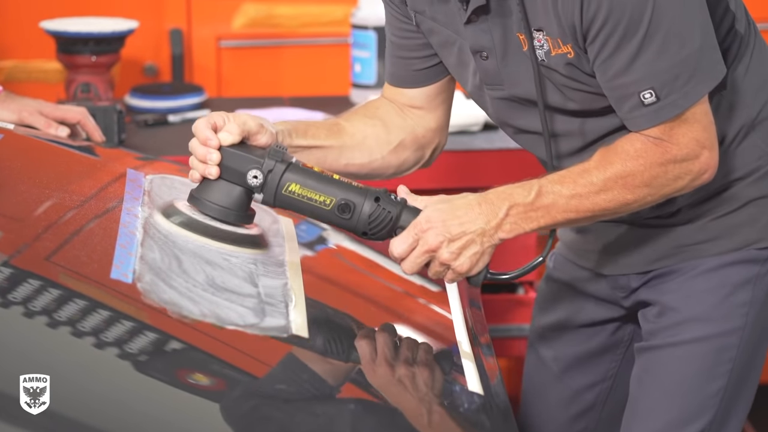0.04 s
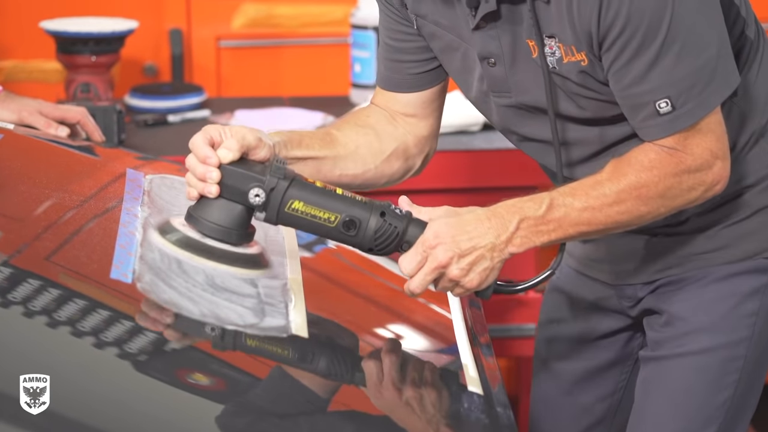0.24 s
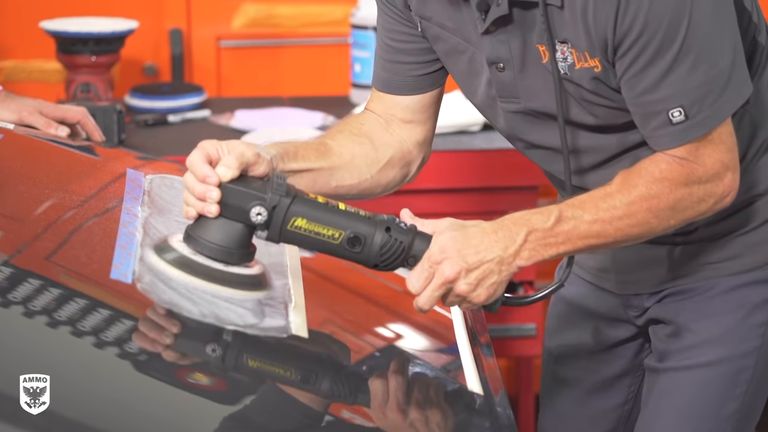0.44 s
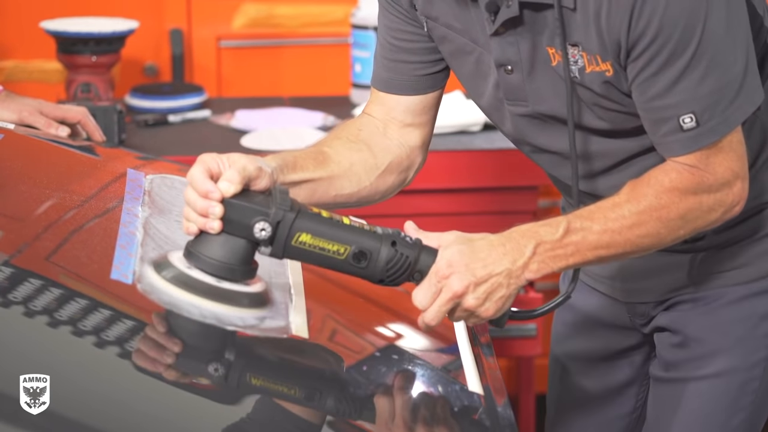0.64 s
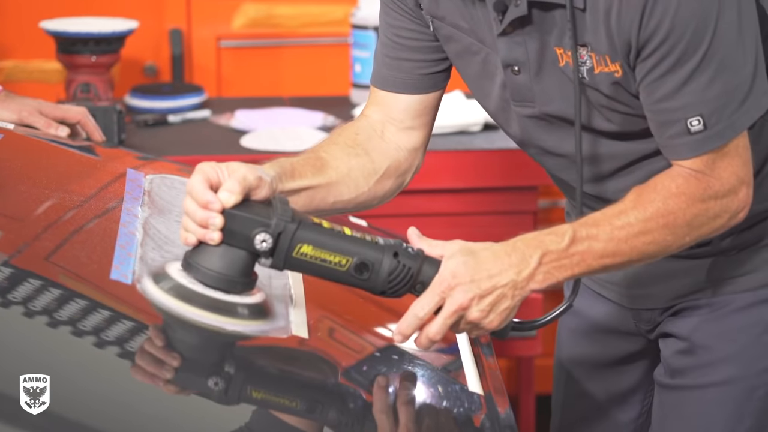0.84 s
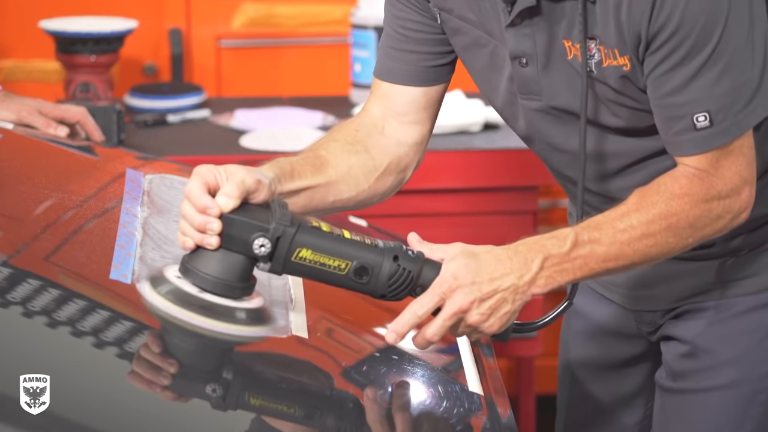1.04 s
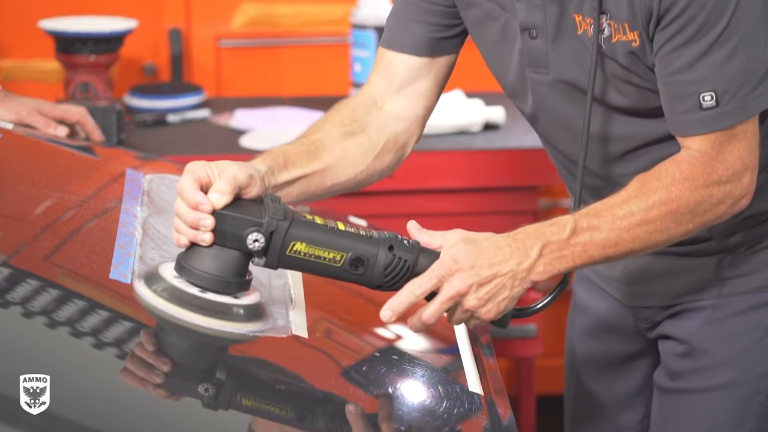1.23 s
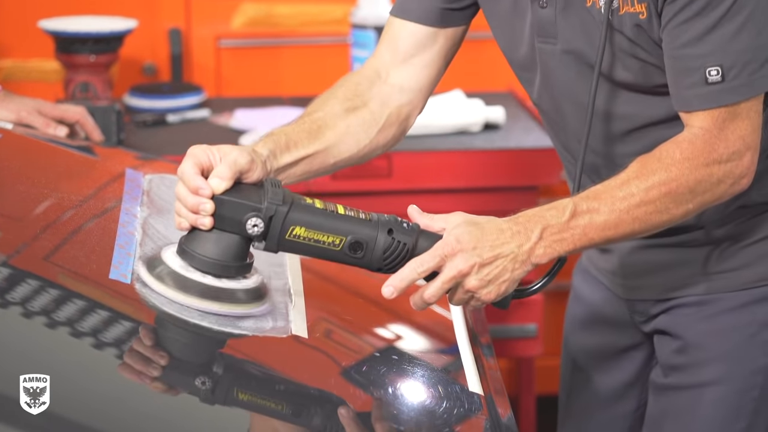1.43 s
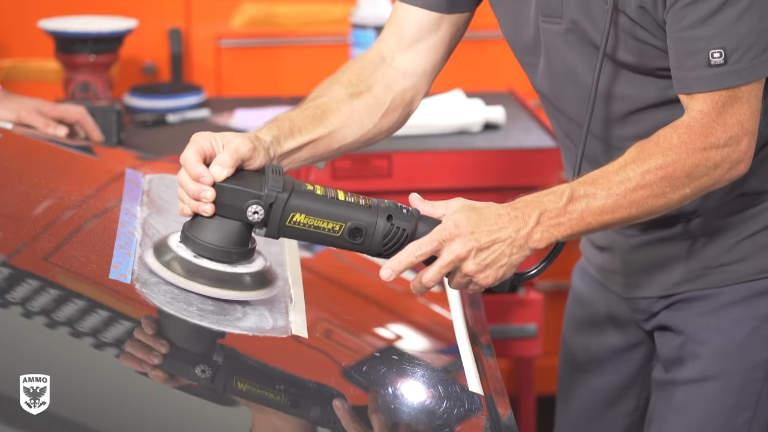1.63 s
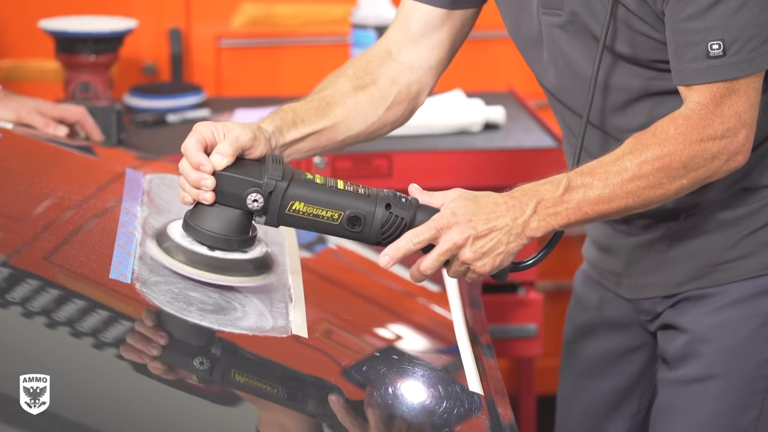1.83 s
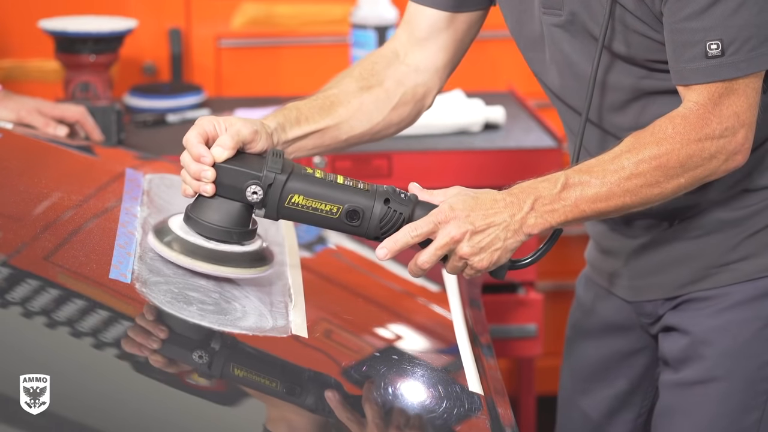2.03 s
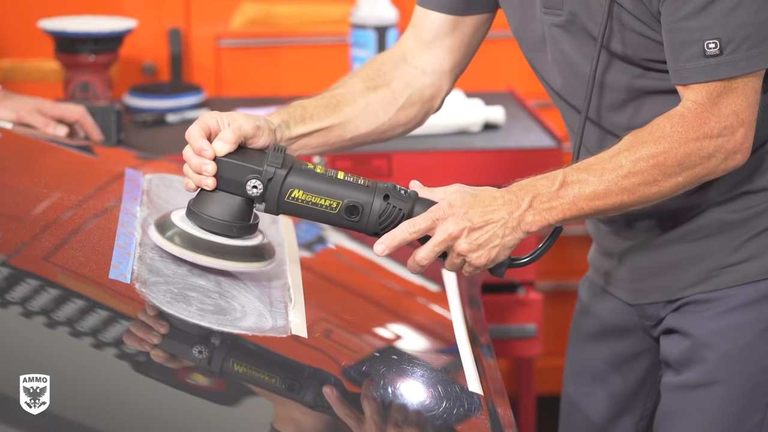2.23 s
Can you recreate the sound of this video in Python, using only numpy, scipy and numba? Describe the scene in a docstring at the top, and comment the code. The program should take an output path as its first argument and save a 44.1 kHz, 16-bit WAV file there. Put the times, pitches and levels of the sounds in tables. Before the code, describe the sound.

Orbital sander hums and hisses against painted sheet metal, switches off and coasts down, clattering

```python
"""Polisher coasting down in a workshop

A dual-action polisher sands a car panel, is switched off and coasts down, heard close in one channel.
The orbit shakes the panel into a hum and the rubbing pad drums it through its resonances; the free
bearing knocks once an orbit, then in loose groups. The disc hisses as coloured noise, gears and fan
whine on multiples of the falling speed, and a short echo, low rumble and faint mains hum lie behind.
"""
import sys
import numpy as np
from scipy import signal
from scipy.fft import rfft, irfft
from scipy.io import wavfile
from scipy.ndimage import uniform_filter1d
from numba import njit

SR = 44100
rng = np.random.default_rng(int(sys.argv[2]) if len(sys.argv) > 2 else 0)


def magnitude_from_level(level_db):
    """Linear magnitude for a level in decibels (20 dB per decade)."""
    exponent = np.asarray(level_db, float) / 20
    return 10 ** exponent


def generate_wav(sig):
    """Save sig (samples, or channels by samples) to the path in sys.argv[1] as 16-bit PCM at SR."""
    pcm = np.round(np.clip(np.atleast_2d(sig).T, -1, 1) * 32767).astype(np.int16)
    wavfile.write(sys.argv[1], SR, pcm)


N = 100239
T = np.arange(N) / SR

# Pad speed as the tool coasts down: time_s, orbit_rate_hz
PAD_SPEED = [(0, 72.4), (.11, 71.5), (.31, 70.5), (.6, 70.6), (.76, 70), (.81, 69.4), (.892, 65.8),
             (.984, 62), (1.106, 58.8), (1.268, 55.1), (1.45, 49.9), (1.7, 43.3), (1.9, 38.4), (2.1, 34),
             (2.27, 30.4)]
# Panel hum at orbit multiples 1 to 4: time_s, first_db, second_db, third_db, fourth_db
PANEL_HUM = [(0, -56, -26.5, -54, -42), (.03, -33, -26, -34, -38.5), (.14, -31, -26, -34.5, -38),
             (.31, -37, -23, -36.5, -46), (.37, -30, -21, -36.5, -37), (.41, -24.5, -26.5, -40, -38.5),
             (.47, -22, -28.5, -39, -41.5), (.59, -28.5, -24, -31, -39), (.73, -34, -20.5, -48.5, -42.5),
             (.82, -33, -23.5, -43.5, -43.5), (.89, -32, -36.5, -48, -48), (.99, -37, -32, -39.5, -38.5),
             (1.1, -33, -29.5, -47, -37.5), (1.15, -39, -34, -34.5, -37.5), (1.21, -38, -61, -47, -57),
             (1.27, -32.5, -31.5, -55, -39.5), (1.33, -34, -50.5, -46, -48),
             (1.4, -46.5, -50, -55.5, -55.5), (1.5, -59, -59, -69, -85), (2.27, -67, -61.5, -81, -78)]
# Orbit knocks: time_s, level_db, lag_turns (behind the orbit)
ORBIT_KNOCKS = [(0, -35, 0.31), (.14, -38, 0.21), (.3, -36, -0.062), (.5, -36.5, 0.016), (.75, -45, 0.029),
                (.87, -41.5, -.05), (1.03, -46, 1.17), (1.11, -43, 1.12)]
# Gear mesh sounded by each knock: orbit_multiple (ratio), level_db
GEAR_MESH = [(39.3, -6), (41.2, 2), (46, -0.5)]
# Loose knocks: start_s, level_db, ring_hz, housing_share_db
LOOSE_KNOCKS = [(0.5518, -17, 11500, -7), (0.7369, -20.5, 10500, 5.5), (1.1222, -16.5, 2258, -22),
                (1.142, -13.5, 4600, -17), (1.159, -16, 2550, -11), (1.174, -18.5, 2640, -18),
                (1.1846, -17, 3620, -13), (1.1974, -14.5, 4300, -11), (1.218, -17, 4800, -6),
                (1.2389, -19, 1060, 2), (1.2504, -27, 3250, 6), (1.2782, -14.5, 4000, -7.5),
                (1.297, -18, 4250, -4), (1.318, -23, 4100, 0.5), (1.336, -16.5, 4100, -7),
                (1.3637, -23, 2530, -9), (1.3877, -16.5, 4100, -17), (1.4272, -16, 4140, -7.5),
                (1.458, -27.5, 2970, 2), (1.492, -18, 1210, -2), (1.509, -18, 4370, -6),
                (1.521, -26.5, 1960, -1), (1.537, -23, 1200, 1), (1.5569, -25, 1790, 3.5),
                (1.571, -24.5, 1200, 4), (1.5847, -25, 1780, -1), (1.624, -29, 1800, 5),
                (1.6685, -26.5, 1810, -1.5), (1.6936, -28.5, 1680, 4), (1.73, -25, 1660, 1),
                (1.779, -21.5, 1850, -2), (1.8198, -21, 1740, -7), (1.838, -28.5, 3080, 3),
                (1.8517, -24, 3040, -3), (1.8555, -25.5, 4410, -0.5), (1.9065, -18.5, 1200, -10),
                (1.9246, -24.5, 6080, -2.5), (1.9366, -19, 1190, -8.5), (1.9946, -23, 1300, 1.5),
                (2.0257, -16, 1110, -16), (2.045, -22, 1230, -6), (2.0598, -24, 4200, -3),
                (2.111, -24.5, 1200, -9), (2.1526, -23.5, 1150, -5.5), (2.2038, -20, 1200, -9),
                (2.228, -18, 1160, -30), (2.237, -26, 1220, -0.5), (2.262, -25, 1040, -4)]
# Resonances of the tool housing: pitch_hz, width_hz, level_db
HOUSING_MODES = [(680, 243, 2), (1200, 140, 3.5), (1810, 550, -6.5), (2290, 550, -4.5), (3030, 440, -3.5),
                 (4410, 350, -3), (5970, 590, -11.5), (8700, 440, -28)]
# Resonances of the sheet-metal panel: pitch_hz, width_hz, level_db
PANEL_MODES = [(231, 230, -10.5), (388, 83, -3.5), (535, 216, -2.5), (693, 183, 0.5), (856, 116, -3.5),
               (1200, 230, -7)]
# Working levels: time_s, panel_drumming_db, disc_hiss_db, fan_rush_db
WORK_LEVELS = [(0, -26.5, -34, -54), (.05, -28, -36, -55), (.3, -29.5, -35, -57), (.56, -28.5, -34, -60),
               (.75, -31.5, -34.5, -59), (.9, -32.5, -38.5, -54), (1.1, -33.5, -40.5, -60),
               (1.3, -35.5, -44, -58), (1.45, -40, -45, -67), (1.7, -45, -45, -67), (1.85, -51.5, -45, -66),
               (2.05, -57, -48, -54.5), (2.27, -76, -50.5, -56)]
# Hiss colour while driven: pitch_hz, density_db (per Hz)
DRIVEN_COLOUR = [(880, -28), (1500, -14), (2330, -14), (2830, -3.5), (3440, -3), (3790, -7.5), (5500, -8),
                 (6490, -20.5), (8130, -15.5), (9880, -26), (12400, -18.5), (15500, -27.5)]
# Hiss colour while coasting: pitch_hz, density_db (per Hz)
COASTING_COLOUR = [(880, -42), (1500, -9), (1880, -5), (2350, -7.5), (2830, -8.5), (3090, -9), (4350, -6.5),
                   (5190, -9), (6010, -10), (8620, -23.5), (13100, -17.5), (15500, -26)]
# Gear and fan whine against the hiss colour: orbit_multiple (ratio), level_db
WHINE_LINES = [(38.5, 4), (41.2, 5), (61.5, 3), (90, 7), (99.3, 8), (106.5, 4), (112.5, 9), (122, 10),
               (127.5, 7), (139, 9), (145.5, 4), (154, 8), (200, 6), (223.5, 7), (257, 6), (290, 5),
               (311.5, 4)]
# Colour of the low room rumble: pitch_hz, density_db (per Hz)
ROOM_COLOUR = [(15, -28), (25, 5), (63, -5.5), (220, -15.5), (528, -4.5), (682, 1), (796, -4.5), (1200, -4),
               (1500, -11), (1950, -49), (3300, -120)]
# Mains hum: pitch_hz, level_db
MAINS_HUM = [(59.5, -61), (119, -69)]


def level(x, db):
    """Scale to an rms level in dB."""
    return x * magnitude_from_level(db) / np.sqrt(np.mean(x ** 2))


def column(table, index):
    """Read one column as a curve in time."""
    return np.interp(T, [row[0] for row in table], [row[index] for row in table])


def sine(turns):
    """Sine of unit rms, its phase given in turns."""
    return np.sqrt(2) * np.sin(2 * np.pi * turns)


@njit
def svf(x, hz, width):
    """State-variable band-pass with a movable centre; both settings in Hz."""
    y, band, low = np.empty(len(x)), 0., 0.
    for i in range(len(x)):
        g, k = np.tan(np.pi * hz[i] / SR), width / hz[i]
        v = (band + g * (x[i] - low)) / (1 + g * (g + k))
        band, low, y[i] = 2 * v - band, low + 2 * g * v, k * v
    return y


def ring(x, modes):
    """Excite parallel resonances, alternating in sign."""
    out = np.zeros(len(x))
    for k, (hz, width, db) in enumerate(modes):
        out += (-1) ** k * magnitude_from_level(db) * svf(x, np.full(len(x), 1. * hz), 1. * width)
    return out


def noise(colour):
    """Noise of unit rms, coloured along log frequency."""
    f = np.arange(1, N // 2 + 2) * SR / N
    hz, db = np.array(colour).T
    gain = magnitude_from_level(np.interp(np.log(f), np.log(hz), db))
    return level(irfft(rfft(rng.standard_normal(N)) * gain, N), 0)


def walk(rate):
    """Smooth random curve of about unit spread, with rate fresh values a second."""
    k = int(SR / rate)
    steps = np.repeat(rng.standard_normal(N // k + 1), k)
    return 0.88 * uniform_filter1d(uniform_filter1d(steps, k), k)[:N]


def bursts(times, db, decay_s):
    """Envelope of sudden contacts, each dying exponentially."""
    kick = np.zeros(N)
    np.add.at(kick, np.clip((times * SR).astype(int), 0, N - 1), magnitude_from_level(db))
    return signal.lfilter([1], [1, -np.exp(-1 / (decay_s * SR))], kick)


def hum(turns):
    """The unbalanced orbit shakes the panel at its first four multiples; the upper ones waver more."""
    out = np.zeros(N)
    for k in range(1, 5):
        gain = magnitude_from_level(column(PANEL_HUM, k) + 0.64 * k * walk(44.7))
        waver_rad = 0.4 * (k - 1) * walk(30.61)
        out += gain * sine(k * turns + waver_rad / (2 * np.pi))
    return out


def orbit_knocks(turns):
    """Each orbit's knock and rebound press the gear teeth together; returns sound and unit-rms envelope."""
    last_knock_s, decay_s = 1.11, 0.0019
    beats = turns - column(ORBIT_KNOCKS, 2)
    count = int(np.interp(last_knock_s, T, beats)) + 1
    jitter, strength, echo_jitter, echo_strength = rng.standard_normal((count, 4)).T
    at = np.arange(count) + 0.06 * jitter  # in orbits
    rebound_at = at + 0.5 + 0.16 * echo_jitter
    knock = bursts(np.interp(at, beats, T), 1.0 * strength, decay_s)
    rebound = bursts(np.interp(rebound_at, beats, T), -10 + 3.5 * echo_strength, decay_s)
    env = knock + rebound

    rough = rng.standard_normal(N)
    mesh = np.zeros(N)
    for k, db in GEAR_MESH:
        waver_rad = 0.75 * walk(89.4)
        mesh += magnitude_from_level(db + 1.9 * walk(19)) * np.sin(2 * np.pi * k * turns + waver_rad)
    contact = env ** 2 * rough + 6 * np.diff(env, prepend=0)
    tick = svf(contact, np.full(N, 8200.), 430.)
    soft = uniform_filter1d(env, size=55)
    housing = ring(soft * rough, HOUSING_MODES)
    tone = level(soft * mesh, 1.0) + level(housing, -3.5) + level(tick, -14.5)
    return tone * magnitude_from_level(column(ORBIT_KNOCKS, 1)), level(env, 0)


def loose_knocks():
    """Slack parts hit the housing; each blow also rings where it lands."""
    size, decay_s = 2048, 0.0033
    fade = np.exp(-np.arange(size) / (decay_s * SR))
    out = np.zeros(N + size)
    for start_s, db, hz, housing_db in np.array(LOOSE_KNOCKS):
        blow = rng.standard_normal(size) * fade
        blow[:2] += 4  # hard first contact
        own = svf(blow, np.full(size, hz), 0.12 * hz)
        housing = ring(blow, HOUSING_MODES)
        hit = magnitude_from_level(-6) * own / np.abs(own).max() + magnitude_from_level(housing_db) * housing / np.abs(housing).max()
        first = int(start_s * SR)
        out[first:first + size] += magnitude_from_level(db) * hit
    return svf(out[:N], np.full(N, 2200.), 7000.)  # broad band-pass


def panel_drumming(env):
    """The rubbing pad drums the sheet metal, harder at each orbit knock."""
    rub = rng.standard_normal(N) * (1 + 0.28 * env) * magnitude_from_level(1.24 * walk(23.6))
    return level(ring(rub, PANEL_MODES), -0.92) * magnitude_from_level(column(WORK_LEVELS, 1))


def disc_hiss(env, coast):
    """The disc's rubbing noise crossfades from driven to coasting colour and swells at each orbit knock."""
    driven = np.sqrt(1 - coast) * noise(DRIVEN_COLOUR)
    coasting = np.sqrt(coast) * noise(COASTING_COLOUR) * magnitude_from_level(1.5)
    air = (driven + coasting) * (1 + 0.36 * env) * magnitude_from_level(2.3 * walk(40.8))
    return air * magnitude_from_level(column(WORK_LEVELS, 2))


def whine(turns, speed, coast):
    """Gears and fan sing on orbit multiples, shaped by the coasting hiss colour shifted up in pitch."""
    colour_shift = 1.17  # frequency ratio
    hz, density_db = np.array(COASTING_COLOUR).T
    lines = np.zeros(N)
    for k, db in WHINE_LINES:
        colour_db = np.interp(k * speed / colour_shift, hz, density_db)
        gain = magnitude_from_level(db - 12 + colour_db + 4 * walk(8))
        waver_rad = 1.1 * walk(60)
        lines += gain * np.sin(2 * np.pi * k * turns + waver_rad)
    return lines * (0.25 + np.sqrt(coast)) * magnitude_from_level(column(WORK_LEVELS, 2))


def fan_rush(speed):
    """The fan's rush is noise in a band that slides down with the speed."""
    hz = 192 * speed
    width = 0.14 * hz.mean()
    rush = svf(svf(rng.standard_normal(N), hz, width), hz, width)
    return level(rush, 0) * magnitude_from_level(column(WORK_LEVELS, 3))


def workshop_echo(tool):
    """The workshop returns the tool's sound as a short decaying noise tail."""
    t60_s, echo_db, first_return_s = 0.14, -15, 0.006
    lag = T[:SR // 2]
    tail = rng.standard_normal(len(lag)) * magnitude_from_level(-60 * lag / t60_s) * (lag > first_return_s)
    return signal.fftconvolve(tool, magnitude_from_level(echo_db) * tail / np.sqrt(np.sum(tail ** 2)))[:N]


def workshop():
    """Low room rumble is coloured noise; mains hum is steady sines."""
    rumble = level(noise(ROOM_COLOUR), -48)
    return rumble + sum(magnitude_from_level(db) * sine(hz * T) for hz, db in MAINS_HUM)


def scene():
    """Tool close by, its echo in the workshop, the panel hum and the room."""
    speed = column(PAD_SPEED, 1)
    turns = np.cumsum(speed) / SR
    coast_from_s, coast_to_s = 0.88, 1.67
    coast = np.clip((T - coast_from_s) / (coast_to_s - coast_from_s), 0, 1)
    knocks, env = orbit_knocks(turns)
    tool = knocks + loose_knocks() + panel_drumming(env)
    tool = tool + disc_hiss(env, coast) + whine(turns, speed, coast) + fan_rush(speed)
    return (tool + workshop_echo(tool) + hum(turns) + workshop())[None]


def band_limit(x):
    """A steep low-pass at the top of the band."""
    return signal.sosfilt(signal.butter(12, 15640, fs=SR, output="sos"), x)


def record(dry):
    """Turn the finished mix into the stored sound."""
    return band_limit(dry)


dry = scene()
out = record(dry)
generate_wav(out)
```